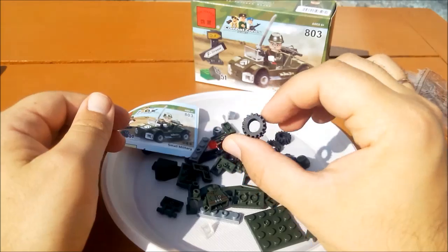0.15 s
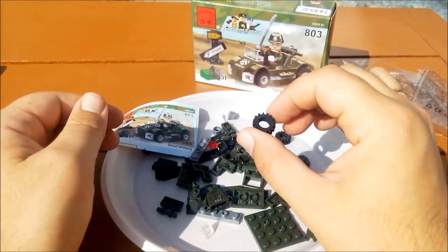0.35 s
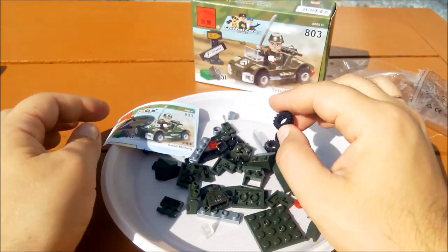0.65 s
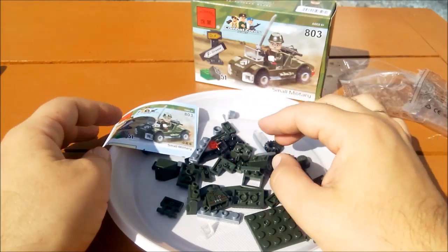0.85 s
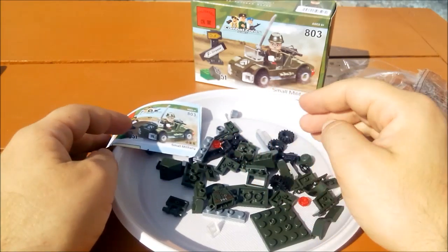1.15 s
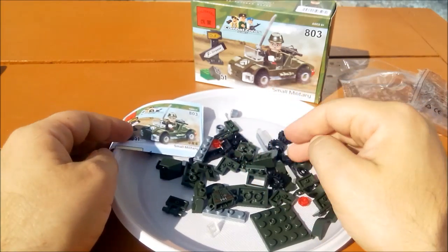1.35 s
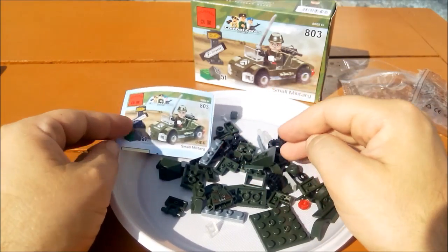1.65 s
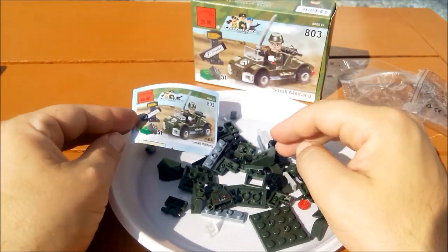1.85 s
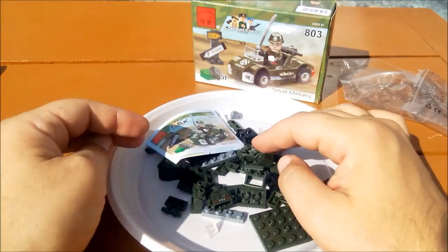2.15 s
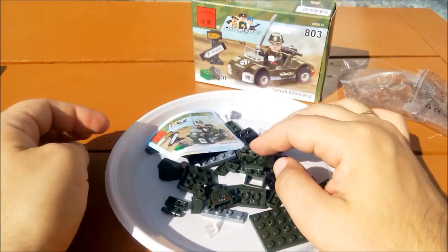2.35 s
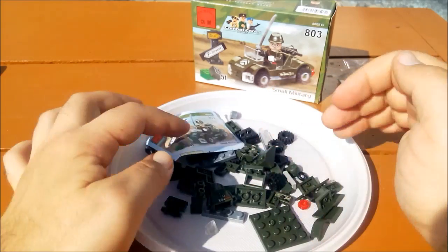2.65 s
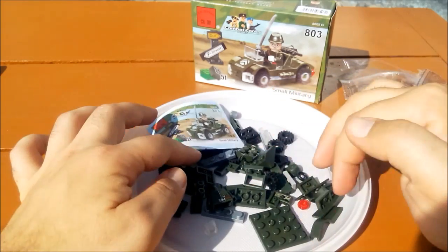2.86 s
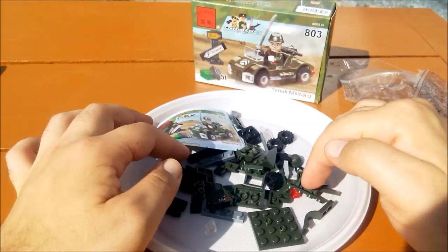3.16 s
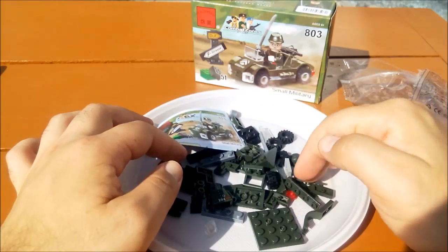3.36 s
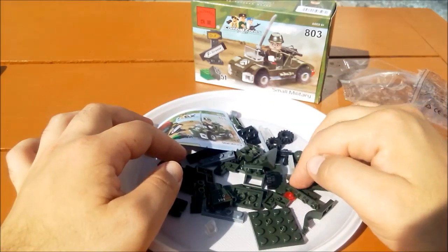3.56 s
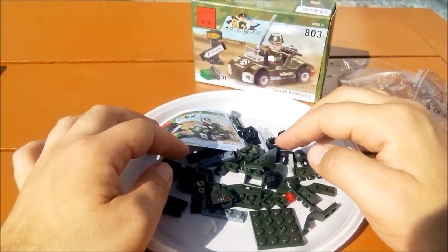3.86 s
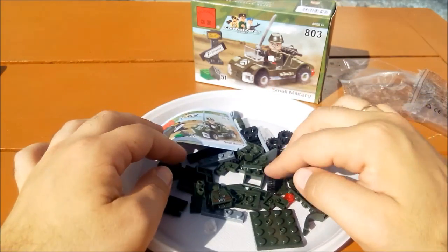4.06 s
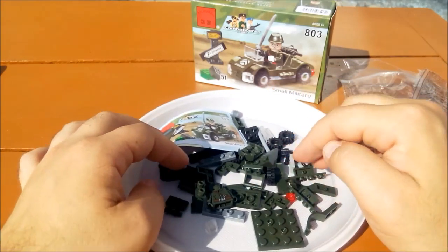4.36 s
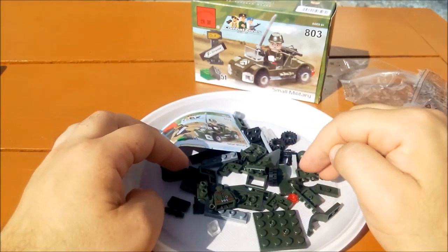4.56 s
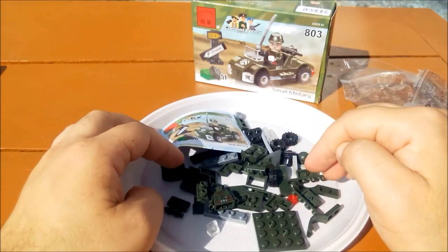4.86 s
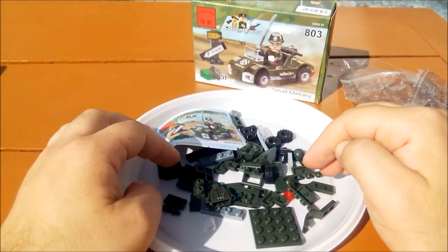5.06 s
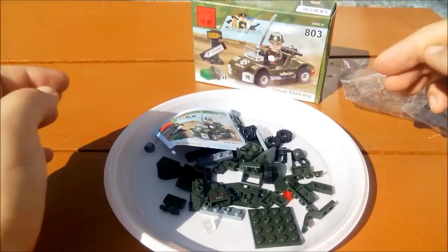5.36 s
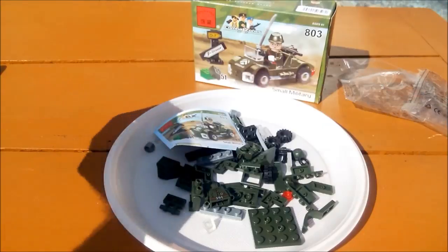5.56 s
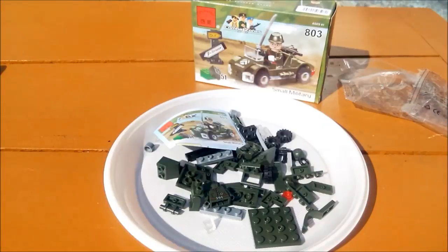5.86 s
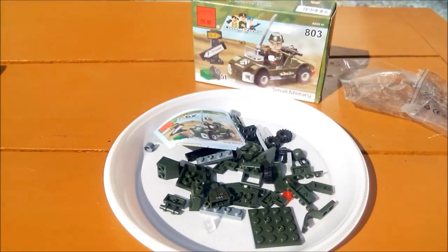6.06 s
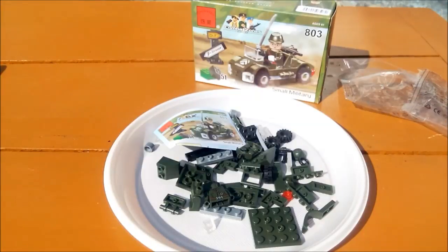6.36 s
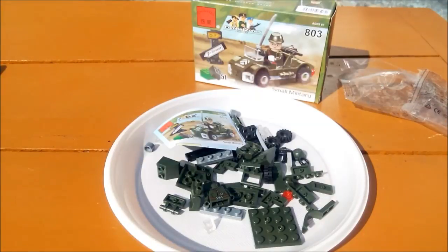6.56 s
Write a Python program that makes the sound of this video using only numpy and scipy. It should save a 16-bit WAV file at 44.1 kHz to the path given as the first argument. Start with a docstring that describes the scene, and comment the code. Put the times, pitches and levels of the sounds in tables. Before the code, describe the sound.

A close, dry stereo pickup with faint steady hiss and dull, low bumps through the table, slightly stronger on the right. The first second has almost only these bumps. At about 1.1-1.3 s a quick cluster of bright plastic clicks breaks in, then from 1.55 s lighter rattling and sliding of small bricks on a thin plastic plate, growing to a dense clatter at 2.2-2.5 s. A short lull follows. From 3.0 s the bricks knock again, with sharp, loud clicks near 3.4, 3.6 and 3.8 s, each a tiny crunchy burst with a short hollow plate thump. Clicks thin out by 4.4 s; a few faint taps and slides appear from 4.7 to 5.5 s. At 5.77 s a soft sleeve rustle swells and drops quickly. Only hiss and muffled table thuds remain, clustered around 6.2-6.4 s, until about 6.7 s.

```python
"""A faint hiss of two microphone capsules, with dull bumps coming through the table from the very start.
After a second, fingers stir small plastic bricks on a thin plastic plate, close to a stereo phone.
Each knock is a burst of tiny contacts that rings one brick (a resonator) and the plate (noise-like ringing),
with a decaying sine as the plate flexes. Near the end a sleeve brushes past: coloured noise that swells and falls."""
import sys
import numpy as np
from scipy import signal
from scipy.fft import rfft, irfft
from scipy.io import wavfile
from scipy.ndimage import uniform_filter1d

SR = 44100
rng = np.random.default_rng(int(sys.argv[2]) if len(sys.argv) > 2 else 0)


def transcribe(u):
    """Save the signal u as a 16-bit wav file named by the first command-line argument.

    u: samples, shape (n,) or (channels, n), limited to [-1, 1]; the rate is SR.
    q: integer samples, one column per channel.
    """
    v = np.clip(np.atleast_2d(u).T, -1, 1)
    q = np.round(v * 32767).astype(np.int16)
    wavfile.write(sys.argv[1], SR, q)


def makeup_ratio(level_db):
    """Linear amplitude ratio for a level in decibels (20 dB per factor of ten)."""
    decades = np.asarray(level_db, float) / 20
    return 10 ** decades


N = 296352  # length [samples]

# Colour of the capsules' self-noise: (frequency [Hz], relative level [dB])
HISS_COLOUR = [(18, -35), (30, 8), (54, 5), (113, -14), (247, -7), (805, -17.5), (2280, -20), (4640, -13.5),
               (7440, -20), (8580, -41.5), (11200, -65.5), (18900, -120)]
# Left-right likeness of the hiss, negative is opposite phase: (frequency [Hz], likeness [limited to -1..1])
HISS_LIKENESS = [(60, -1.3), (120, -1.3), (240, -0.16), (490, -0.26), (990, -0.18), (2000, 0.14),
                 (4030, -0.83), (8130, -0.84)]
# Fingers push the heap along: (time [s], sliding level [dB])
SLIDING = [(0.0, -68.5), (0.99, -72), (1.16, -51), (1.31, -67.5), (1.52, -70.5), (1.59, -55), (1.74, -45.5),
           (1.86, -53), (2.08, -65), (2.36, -40.5), (2.53, -71), (2.98, -64), (3.22, -53), (3.5, -68.5),
           (4.44, -71.5), (4.68, -67.5), (4.79, -55.5), (4.93, -68), (5.15, -66), (5.31, -57), (5.6, -67.5),
           (6.72, -67.5)]
# Colour the plate radiates: (frequency [Hz], relative level [dB])
PLATE_COLOUR = [(88, -22), (150, -7), (271, -7.5), (381, -17), (466, -54), (571, -20), (966, -17),
                (1360, -24), (1630, -14.5), (2180, -0.5), (2900, -3), (5250, 4), (7120, -5), (7900, -13),
                (8580, -40), (11200, -69), (18900, -120)]
# How fast the plate's ringing dies: (frequency [Hz], time to fall 60 dB [s])
PLATE_DECAY = [(250, .06), (1000, .035), (2200, .03), (5000, .014), (8000, .01)]
# Left-right likeness of the plate's ringing: (frequency [Hz], likeness [-1..1])
PLATE_LIKENESS = [(200, 1), (600, 0.82), (1000, 0.87), (2100, 0.68), (3100, 0.53), (4500, 0.37),
                  (6000, -0.51), (7500, -0.86)]
# Lean of the plate's ringing to the left: (frequency [Hz], left minus right [dB])
PLATE_LEAN = [(300, -0.5), (1000, 1.5), (3000, 1.5), (4800, 4), (5500, -1), (7000, 3.5)]
# Colour of the table's shudder: (frequency [Hz], relative level [dB])
SHUDDER_COLOUR = [(20, -8.5), (65, -2.6), (120, -1), (250, -20), (450, -37.5), (900, -62.5)]
# Bumps in the table: (time [s], depth of the dip before its low-pass [dB])
TABLE_BUMPS = [(0.0136, -33), (0.131, -42.5), (0.1943, -41), (0.463, -44), (0.663, -36), (1.0328, -32),
               (1.21, -40.5), (1.2625, -41.5), (1.832, -34.5), (1.9793, -36), (2.006, -33.5),
               (2.033, -42.5), (2.4319, -33.5), (2.916, -35.5), (2.9587, -33), (3.294, -39.5),
               (3.3238, -30.5), (3.3518, -25), (3.3857, -35), (3.415, -38), (4.0623, -37.5), (4.191, -36.5),
               (4.248, -28), (4.3286, -45), (4.357, -36), (4.465, -41.5), (4.675, -30), (4.6937, -37),
               (4.869, -43), (5.169, -45.5), (5.198, -38.5), (5.257, -42), (5.38, -31), (5.4533, -42),
               (5.4717, -42), (5.637, -40), (5.7096, -39.5), (5.7353, -26), (5.8502, -37.5), (5.8702, -38),
               (6.0083, -39), (6.2188, -29), (6.2357, -31), (6.257, -32), (6.2953, -30), (6.3657, -33),
               (6.419, -27.5)]
# Bricks knocking: (time of the main blow [s], knock level [dB], brick pitch [Hz], fade of the rattle [s])
BRICK_KNOCKS = [(0.9837, -58, 2720, 1), (1.138, -34, 4050, 0.064), (1.174, -29, 4800, 0.046),
                (1.192, -32, 5480, 0.15), (1.2219, -36.5, 5580, 0.16), (1.2487, -40.5, 6020, 0.068),
                (1.5625, -52.5, 5460, 0.54), (1.591, -45, 5700, 0.076), (1.6133, -41.5, 5580, 0.17),
                (1.6383, -35, 5980, 0.17), (1.6755, -38, 4120, 0.22), (1.7321, -36, 5970, 0.038),
                (1.7458, -37.5, 2180, 0.049), (1.805, -44, 4200, 0.065), (1.8206, -39.5, 4520, 0.089),
                (1.9277, -41, 5200, 0.059), (1.952, -46.5, 4600, 0.02), (1.9659, -42, 4840, 0.049),
                (1.9949, -47.5, 5400, 0.084), (2.0363, -48.5, 4900, 0.057), (2.1186, -44.5, 6000, 0.081),
                (2.1334, -44, 5130, 0.03), (2.181, -50.5, 4500, 0.1), (2.1903, -41, 6030, 0.051),
                (2.214, -38.5, 5080, 0.11), (2.2264, -35, 5200, 0.11), (2.2483, -34, 5100, 0.034),
                (2.2616, -28, 5040, 0.15), (2.292, -33, 5700, 0.1), (2.3148, -31, 4970, 0.087),
                (2.349, -31.5, 4570, 0.032), (2.3725, -34, 4700, 0.033), (2.3877, -37.5, 4900, 0.053),
                (2.4336, -29.5, 4000, 0.22), (2.445, -28.5, 5640, 0.043), (2.4621, -37, 5500, 0.14),
                (2.5003, -36, 4540, 0.074), (2.525, -42, 4320, 0.049), (2.743, -56.5, 3640, 0.11),
                (3.012, -39.5, 4500, 0.25), (3.0404, -35.5, 4970, 0.095), (3.072, -43, 4060, 0.076),
                (3.154, -50, 5770, 0.16), (3.1965, -46.5, 4040, 0.099), (3.208, -44, 4500, 0.084),
                (3.2186, -38.5, 4250, 0.032), (3.252, -41.5, 3850, 0.058), (3.266, -37.5, 4240, 0.088),
                (3.283, -32.5, 3900, 0.1), (3.316, -45, 4950, 0.13), (3.35, -31.5, 4100, 0.35),
                (3.379, -25, 5910, 0.13), (3.406, -27.5, 5470, 0.089), (3.4382, -32.0, 3850, 0.022),
                (3.49, -49, 4200, 0.05), (3.553, -50.5, 5000, 0.098), (3.5634, -43, 4150, 0.29),
                (3.6045, -30, 5630, 0.12), (3.6515, -48, 4180, 0.028), (3.716, -51.5, 4500, 0.17),
                (3.7301, -40, 4330, 0.15), (3.7735, -25, 4240, 0.095), (3.798, -36.5, 4460, 0.06),
                (3.8252, -43.5, 3830, 0.07), (3.9047, -36, 5470, 0.09), (3.9245, -35, 4440, 0.084),
                (3.9491, -36, 4100, 0.063), (3.9635, -38, 4140, 0.084), (4.03, -38.5, 6240, 0.083),
                (4.0412, -37, 4200, 0.017), (4.0565, -46, 7130, 0.051), (4.1796, -44.5, 5460, 0.46),
                (4.2423, -45, 4200, 0.07), (4.2756, -43.5, 4030, 0.13), (4.2962, -37, 5460, 0.14),
                (4.3584, -50, 5890, 0.13), (4.3918, -46.5, 5450, 0.11), (4.685, -58, 2630, 0.08),
                (4.8596, -46, 3630, 0.092), (4.9, -51, 4040, 0.024), (4.99, -62, 4000, 0.3),
                (5.037, -51, 5420, 0.027), (5.1975, -53, 3180, 0.48), (5.2483, -52, 5150, 0.19),
                (5.344, -48, 5900, 0.046), (5.361, -48.5, 3920, 0.13), (5.408, -46.5, 2390, 0.089),
                (5.419, -44.5, 2620, 0.043), (5.453, -51, 5300, 0.036), (5.5005, -58, 4640, 0.046)]
# Colour of the sleeve's rustle: (frequency [Hz], relative level [dB])
CLOTH_COLOUR = [(200, 6.5), (400, -1.5), (700, -2.5), (1400, -2.5), (2200, -5.5), (4000, -1), (6500, -12),
                (8500, -26)]
# Left-right likeness of the rustle: (frequency [Hz], likeness [-1..1])
CLOTH_LIKENESS = [(300, 0.82), (2000, 0.66), (5000, 0.035)]

HISS_DB = -56.5
CONTACTS_PER_S = 3000
LEAD = 160  # samples that a plate ring swells before its peak
SPOTS, SPOT_SAMPLES, SPOT_COLOUR_DB = 14, 80, 1.5  # places struck, stay at each, their difference in colour
HAND_S, FREE_DB, HELD_DB = 3.1, 3, 1.2  # a hand laid on the plate damps its low modes: their lift before, after
# shudder of the table: at rest, relative to each bump, relative to the sliding, 60 dB decay after a bump [s]
REST_DB, AFTER_DB, PUSHED_DB, AFTER_T60 = -65.5, -19.5, -10.5, 0.2
BUMP_MS, NARROWING_DB_PER_DB = 6, 0.38  # time scale of a -40.5 dB bump; harder bumps are shorter
CREEP_S, CREEP_DB = 0.012, -22  # the bricks scrape softly just before they knock
BUILD_MS, BUILD_DB_PER_DB = 5, 0.45  # build-up of a -40 dB knock; harder knocks gather longer
SETTLE_DB = 18  # shifts the fade to come late, as the bricks come to rest
BLOW_DB = 9.5  # main blow above the knock level
# lone brick: gain at a -42 dB knock (lighter knocks ring out more clearly), width of its resonance
BRICK_DB, LONE_DB_PER_DB, BRICK_WIDTH_HZ = -7.5, 0.16, 220
# lowest flexing of the plate under each main blow: centre pitch, 60 dB decay [s], level against the knock
THUMP_HZ, THUMP_T60, THUMP_FREE_DB, THUMP_HELD_DB = 269, 0.067, -9.5, -15
BRUSH_S, BRUSH_DB, BRUSH_RISE_DB_PER_S, BRUSH_FALL_DB_PER_S = 5.772, -49.5, 100, 333


def evened(x):
    """Scales to rms 1."""
    return x / np.sqrt(np.mean(x ** 2) + 1e-20)


def read(points, hz):
    """Reads a table on a log-frequency axis."""
    f, value = np.transpose(points)
    return np.interp(np.log(hz + 1), np.log(f + 1), value)


def smooth_wander(length, size):
    """Slow random drift of rms 1: noise averaged twice."""
    noise = rng.standard_normal(length)
    return evened(uniform_filter1d(uniform_filter1d(noise, size=size), size=size))


def add(mix, s, sound):
    """Mixes a sound in from time s."""
    sound = sound[..., max(-round(s * SR), 0):]
    part = mix[..., max(round(s * SR), 0):][..., :sound.shape[-1]]
    part += sound[..., :part.shape[-1]]


def noise_pair(length, likeness):
    """Spectra of two white noises that share as much as the likeness table says."""
    hz = np.fft.rfftfreq(length, 1 / SR)
    left, other = rfft(rng.standard_normal((2, length)))
    c = np.clip(read(likeness, hz), -1, 1)
    return hz, np.array([left, c * left + np.sqrt(1 - c ** 2) * other])


def stereo_noise(colour, likeness):
    """Coloured stereo noise of rms 1 for the whole scene."""
    hz, spectra = noise_pair(N, likeness)
    return evened(irfft(makeup_ratio(read(colour, hz)) * spectra, N))


def hiss():
    """Steady self-noise, opposite in phase in the lowest bass and largely so in the treble."""
    return makeup_ratio(HISS_DB) * stereo_noise(HISS_COLOUR, HISS_LIKENESS)


def sliding_gain():
    """Level of the sliding heap as a gain for every sample."""
    return makeup_ratio(np.interp(np.arange(N) / SR, *np.transpose(SLIDING)))


def contacts(length, spread_db):
    """Tiny impacts at random moments, a few much larger than the rest."""
    size = makeup_ratio(spread_db * np.minimum(rng.exponential(1, length), 4))
    signed = size * rng.choice([-1, 1], length)
    return evened(signed * (rng.random(length) < CONTACTS_PER_S / SR))


def sliding():
    """The pushed heap slides over the plate in a stream of tiny contacts."""
    return sliding_gain() * contacts(N, spread_db=4.0)


def plate_ring():
    """Stereo answer to a tap at one spot: many close modes, each band dying at its own rate."""
    hz, spectra = noise_pair(4096, PLATE_LIKENESS)
    f, t, frames = signal.stft(irfft(spectra), SR, nperseg=256)
    t60 = np.clip(read(PLATE_DECAY, f), 0.005, 1)[:, None]
    ring = signal.istft(frames * makeup_ratio(-60 * t / t60), SR, nperseg=256)[1][:, :4096]
    z = rfft(ring)
    z /= np.sqrt(uniform_filter1d(abs(z) ** 2, size=41, axis=1))  # flatten before colouring
    humps = SPOT_COLOUR_DB * smooth_wander(len(hz), 60)  # each spot favours some bands
    lean = np.outer([0.5, -0.5], read(PLATE_LEAN, hz))
    z *= makeup_ratio(humps + read(PLATE_COLOUR, hz) + lean)
    ring = np.roll(irfft(z), LEAD, axis=1)[:, :3072] * signal.windows.tukey(3072, 0.08)
    return ring / np.linalg.norm(ring.mean(0))


def plate(drive):
    """The contacts hop between spots of the plate, each spot with its own ring."""
    spot = rng.integers(0, SPOTS, N // SPOT_SAMPLES + 1).repeat(SPOT_SAMPLES)[:N]
    sound = np.zeros((2, N))
    for k in range(SPOTS):
        struck = (drive * (spot == k))[None]
        sound += signal.oaconvolve(struck, plate_ring(), axes=1)[:, LEAD:N + LEAD]
    low_modes = signal.sosfiltfilt(signal.butter(2, 1100, fs=SR, output="sos"), sound)
    lift = makeup_ratio(np.where(np.arange(N) < HAND_S * SR, FREE_DB, HELD_DB))
    return sound + (lift - 1) * low_modes


def table_shudder():
    """Lumpy low noise in the table, fed by each bump and by the sliding."""
    after, late = np.zeros(N), np.arange(SR // 2) / SR
    for at, db in TABLE_BUMPS:
        dying = makeup_ratio(db + AFTER_DB - 60 * late / AFTER_T60)
        add(after, at, np.minimum(late / 0.0033, 1) * dying)
    hz = np.fft.rfftfreq(N, 1 / SR)
    rumble = irfft(makeup_ratio(read(SHUDDER_COLOUR, hz)) * rfft(rng.standard_normal(N)), N)
    lumps = makeup_ratio(2.5 * smooth_wander(N, 900))
    return evened(rumble * lumps) * (makeup_ratio(REST_DB) + after + makeup_ratio(PUSHED_DB) * sliding_gain())


def table_bumps():
    """Each bump: a small swing up, a deep dip, then a slowing wobble."""
    out, t = np.zeros(N), np.arange(-0.03, 0.06, 1 / SR)
    for at, db in TABLE_BUMPS:
        u = 1000 * t / (BUMP_MS * makeup_ratio(-NARROWING_DB_PER_DB * (db + 40.5)))
        half_turns = np.log1p(0.57 * abs(u)) / np.log1p(0.77)
        envelope = np.where(u < 0, np.exp(-0.22 * u ** 2), np.exp(-0.6 * u))
        add(out, at - 0.03, -makeup_ratio(db) * np.cos(np.pi * half_turns) * envelope)
    return signal.sosfilt(signal.butter(2, 420, fs=SR, output="sos"), out)


def table():
    """Shudder and bumps through the table, stronger on the right."""
    return (table_shudder() + table_bumps()) * makeup_ratio([[-1.2], [1.2]])


def knock_contacts(t, db, fade, rise):
    """Contacts creep in, thicken up to one main blow, then rattle away ever faster."""
    creep = makeup_ratio(CREEP_DB) * np.minimum(t / CREEP_S, 1)
    age = np.maximum(t - CREEP_S - rise, 0) / max(fade, 0.02)
    fall_db = (65 - SETTLE_DB) * age + SETTLE_DB * (2 * age) ** 2 / 2  # 83 dB at age 1
    force = np.clip((t - CREEP_S) / rise, creep, 1) * makeup_ratio(db - fall_db)
    hits = force * contacts(len(t), spread_db=3)
    hits[round((CREEP_S + rise) * SR)] = makeup_ratio(db + BLOW_DB)
    return hits


def brick_ring(hits, db, hz):
    """One brick rings: the contacts excite a single two-pole resonance."""
    r, turn = np.exp(-np.pi * BRICK_WIDTH_HZ / SR), 2 * np.pi * hz / SR
    gain = 2 * np.sqrt(1 - r) * np.sin(turn)
    ring = signal.lfilter([gain], [1, -2 * r * np.cos(turn), r * r], hits)
    return makeup_ratio(BRICK_DB - LONE_DB_PER_DB * (db + 42)) * ring


def plate_thump(t, at, db, bend):
    """The plate flexes in its lowest mode: a decaying sine, its pitch varied from knock to knock."""
    level = db + (THUMP_FREE_DB if at < HAND_S else THUMP_HELD_DB)
    envelope = np.minimum(t / 0.0038, 1) * makeup_ratio(level - 60 * t / THUMP_T60)
    return envelope * np.sin(2 * np.pi * THUMP_HZ * bend * t)


def bricks():
    """Each knock rings a brick and thumps the plate; its contacts join the sliding to ring the plate."""
    drive, rings = sliding(), np.zeros((2, N))
    t = np.arange(SR // 4) / SR
    for at, db, hz, fade in BRICK_KNOCKS:
        side, bend = rng.uniform([0.54, 0.7], [1.9, 1.3])  # gain on the right, factor on the thump's pitch
        rise = np.clip(BUILD_MS / 1000 * makeup_ratio(BUILD_DB_PER_DB * (db + 40)), 0.0005, 0.04)
        start = at - CREEP_S - rise - 0.0015  # the ring peaks a little after the blow
        hits = knock_contacts(t, db, fade, rise)
        add(drive, start, hits)
        add(rings, at - 0.003, plate_thump(t, at, db, bend))
        add(rings, start, np.outer([2 - side, side], brick_ring(hits, db, hz)))
    return rings + plate(drive)


def sleeve():
    """As the hands leave, a soft, wide rustle of cloth swells and falls away."""
    t = np.arange(N) / SR - BRUSH_S
    swell = np.minimum(BRUSH_RISE_DB_PER_S * t, -BRUSH_FALL_DB_PER_S * t)
    return makeup_ratio(BRUSH_DB + swell) * stereo_noise(CLOTH_COLOUR, CLOTH_LIKENESS)


def scene():
    """Everything at the two capsules."""
    return hiss() + table() + bricks() + sleeve()


def top_cut(x):
    """Nothing passes above the cut-off."""
    return signal.sosfilt(signal.butter(12, 8730, fs=SR, output="sos"), x)


def record(dry):
    """Low cut and steep band limit of the phone, and the resting offset of its converter."""
    low_cut = signal.sosfilt(signal.butter(2, 36, "high", fs=SR, output="sos"), dry)
    band = signal.sosfilt(signal.cheby2(8, 42, 8950, fs=SR, output="sos"), low_cut)
    finished = band - 0.0011
    return top_cut(finished)


dry = scene()
out = record(dry)
transcribe(out)
```